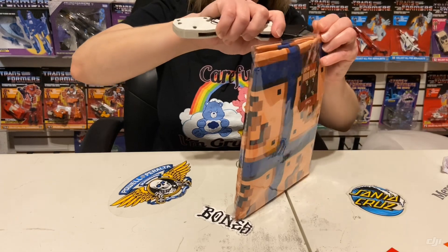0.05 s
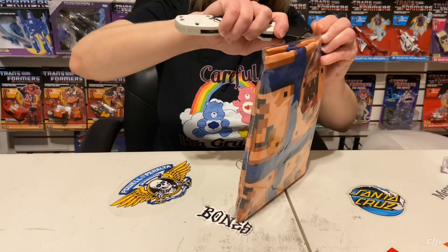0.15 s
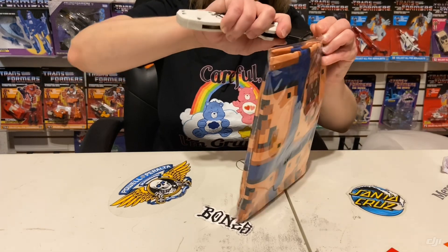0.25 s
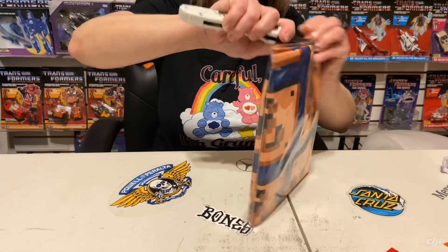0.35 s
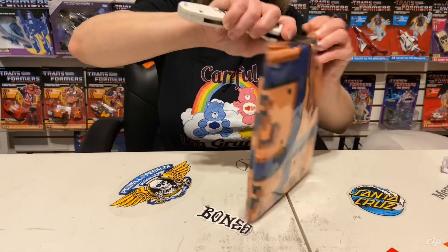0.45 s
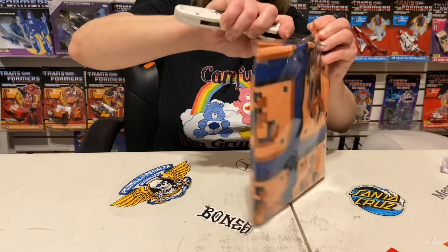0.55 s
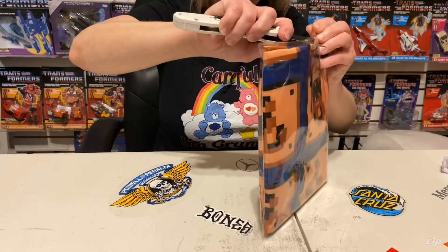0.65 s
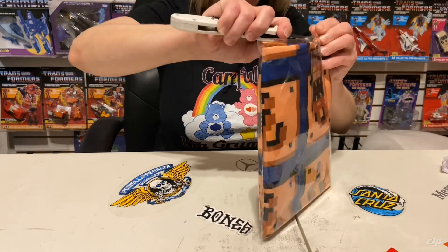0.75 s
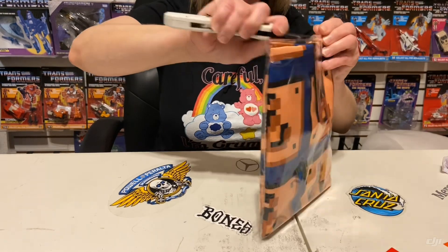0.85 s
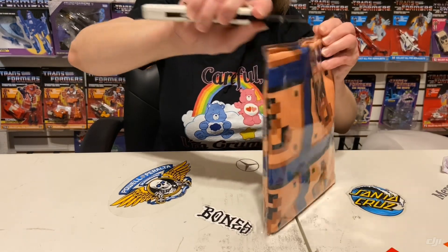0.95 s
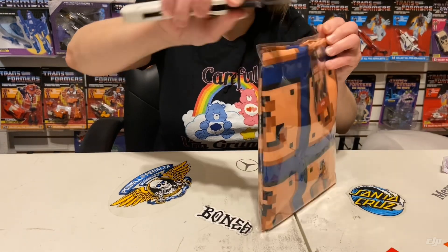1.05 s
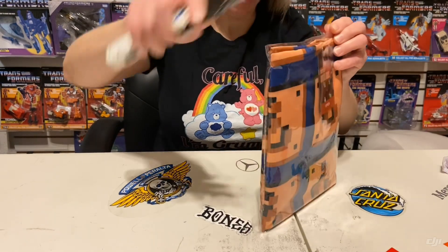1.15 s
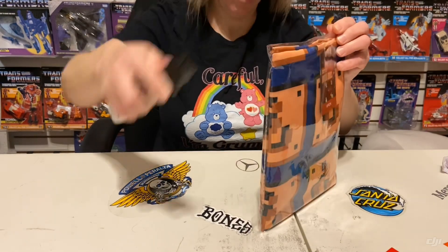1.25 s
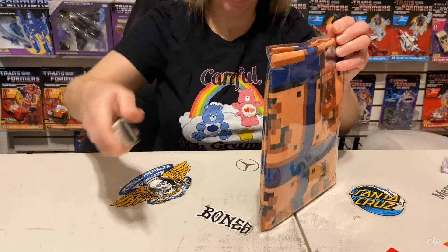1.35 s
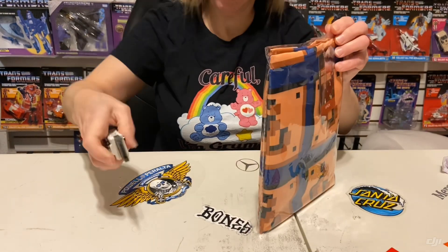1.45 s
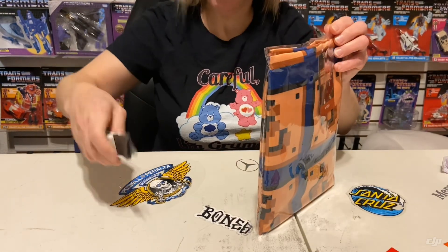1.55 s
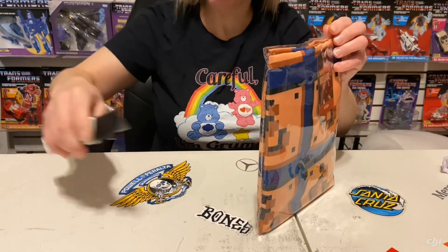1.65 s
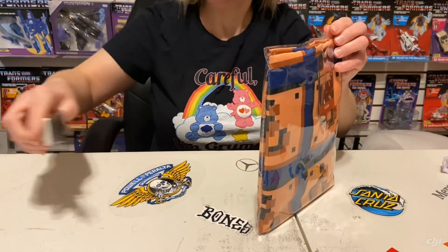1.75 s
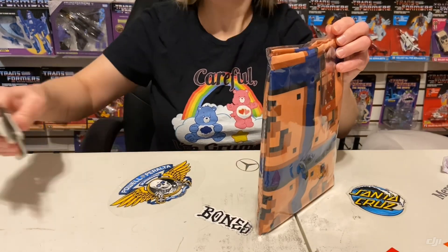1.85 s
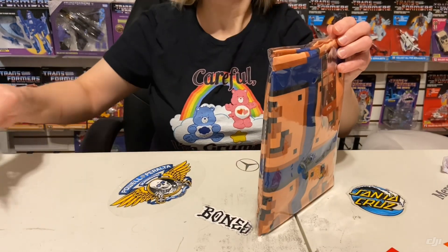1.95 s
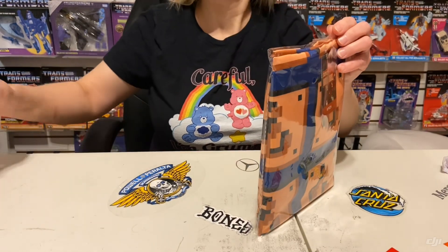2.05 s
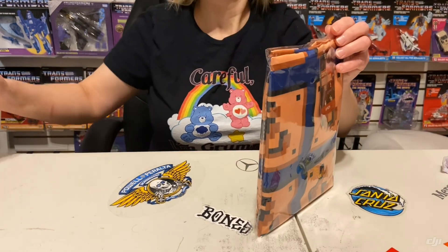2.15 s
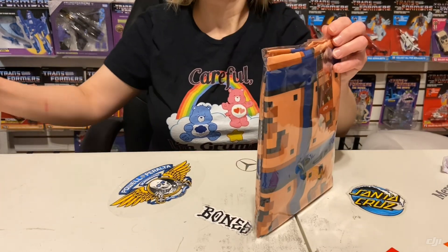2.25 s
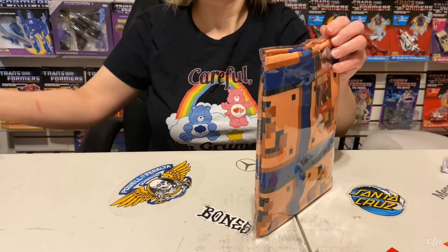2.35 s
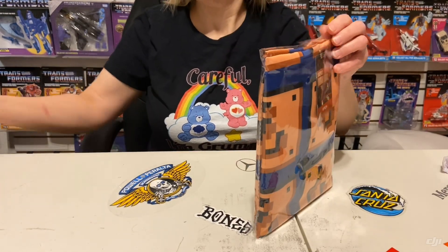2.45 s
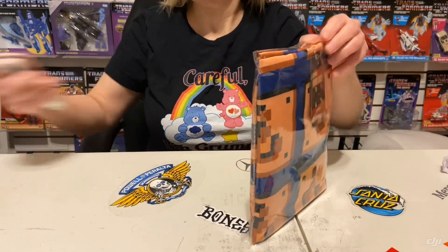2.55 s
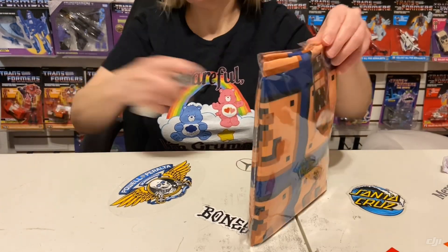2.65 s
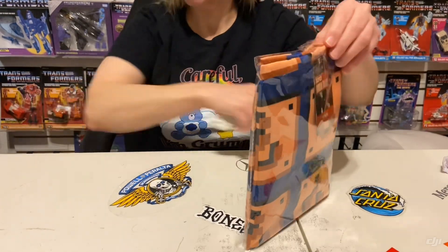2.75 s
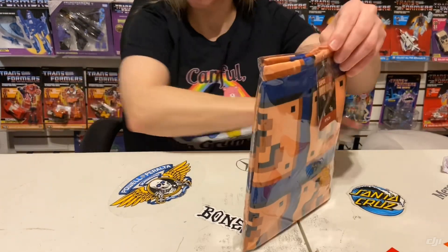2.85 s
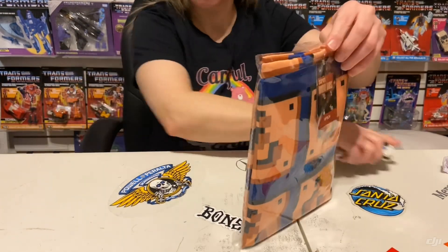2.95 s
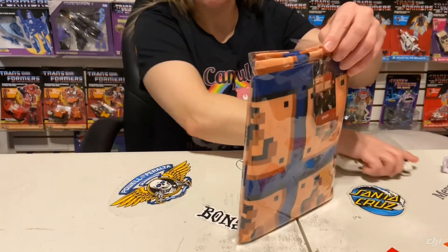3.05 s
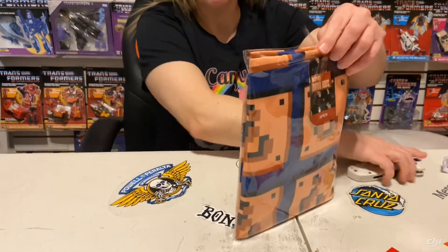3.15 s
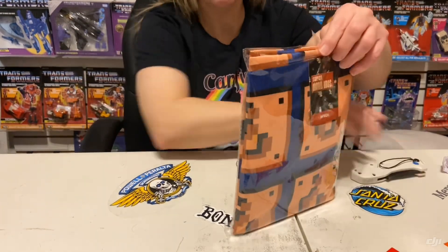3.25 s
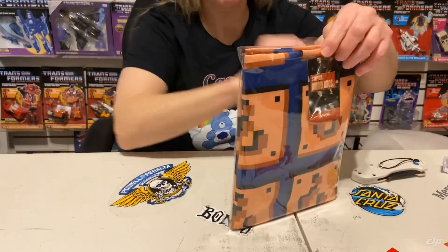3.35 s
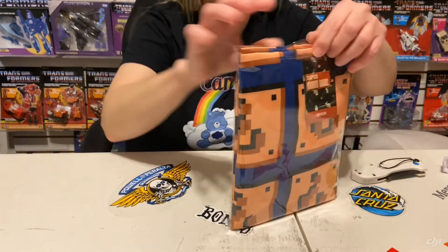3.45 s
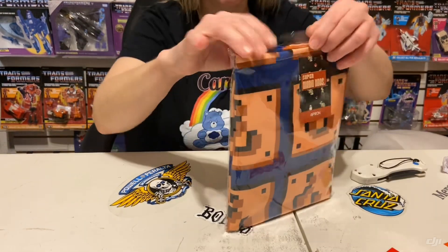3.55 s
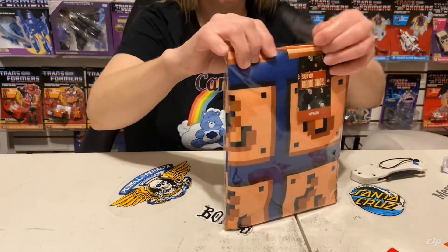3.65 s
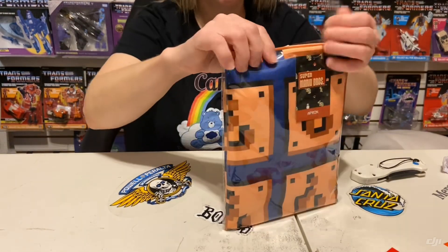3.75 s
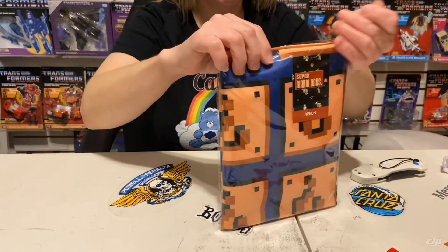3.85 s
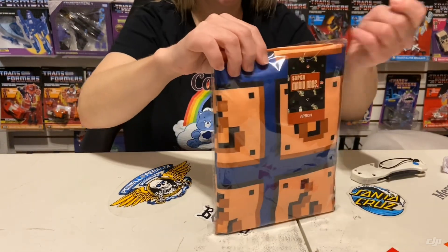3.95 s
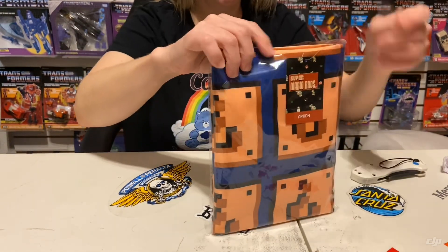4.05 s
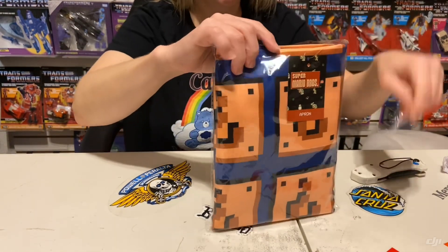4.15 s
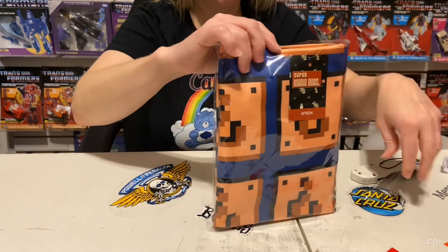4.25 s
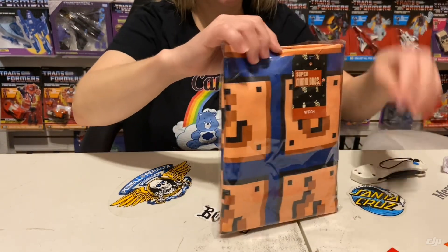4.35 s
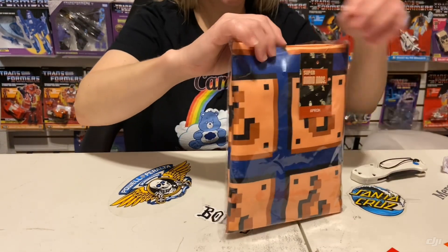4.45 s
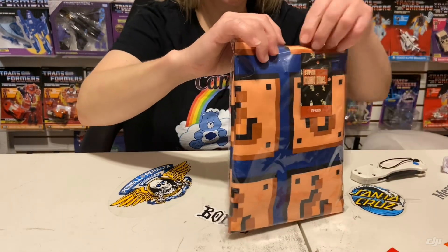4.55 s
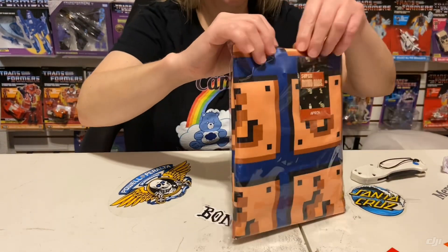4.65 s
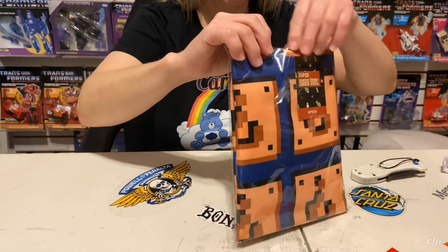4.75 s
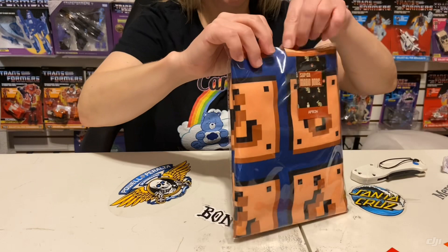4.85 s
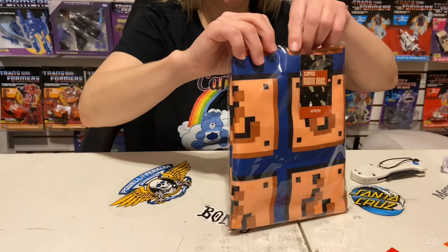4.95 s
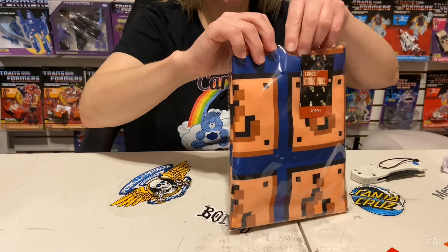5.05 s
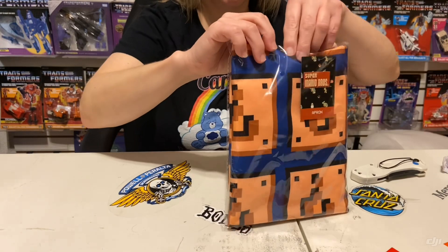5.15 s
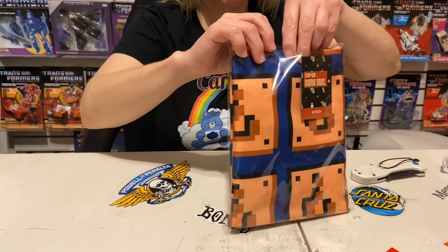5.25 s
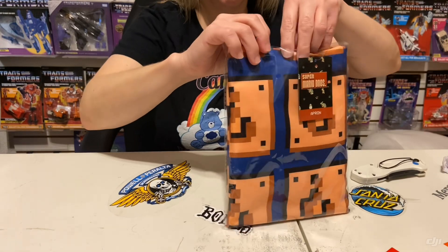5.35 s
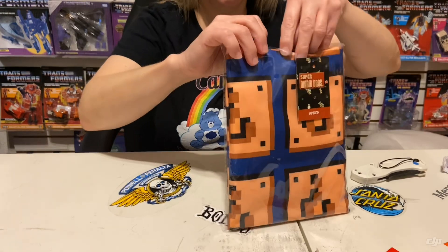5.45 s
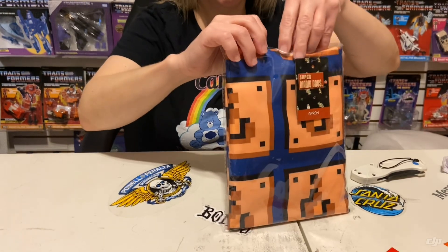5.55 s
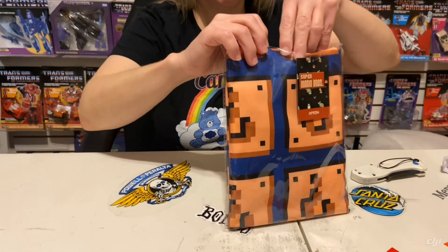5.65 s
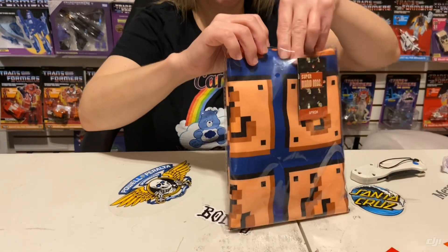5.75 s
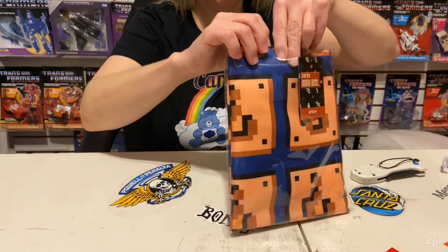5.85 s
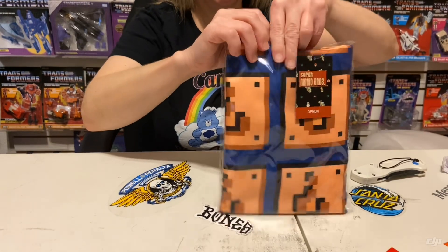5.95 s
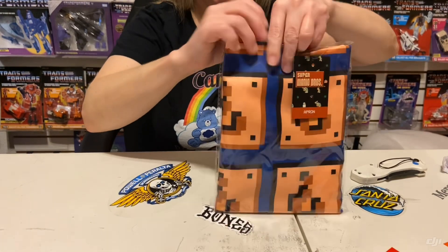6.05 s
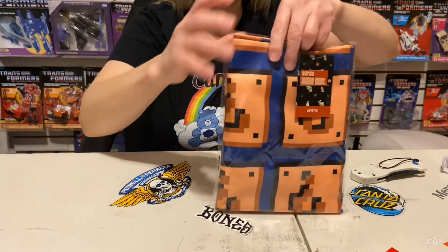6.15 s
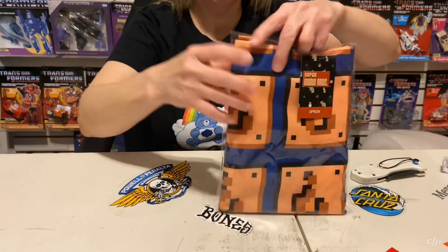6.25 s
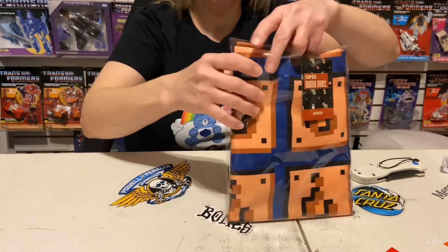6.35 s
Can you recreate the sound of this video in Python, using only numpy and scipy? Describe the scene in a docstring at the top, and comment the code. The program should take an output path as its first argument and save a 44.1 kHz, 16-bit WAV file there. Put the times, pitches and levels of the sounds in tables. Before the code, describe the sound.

Bright bursts of crinkling film come first, thinning out after about a second. A pocketknife closes with a quick gritty scrape and a sharp metallic click, then clacks onto the table top amid renewed crackling. Irregular snaps and rustles continue, with muffled cloth movement and low bumps near the end. Close, dry indoor sound with a short room tail and faint air noise.

```python
"""Close up, film crackles along a blade as a plastic bag holding folded fabric is slit open at a table.
The folding knife scrapes round its pivot, clicks shut and is put down on the table top.
Fingers then pry at the mouth of the bag: creases snap, fabric rubs, and the table is bumped twice.
Film and cloth are swarms of small ringing cracks; knife and table are struck noise and decaying modes.
The room is small and quiet: faint air noise lies under everything, and a diffuse tail follows the sounds."""
import sys
import numpy as np
from scipy import signal
from scipy.fft import rfft, irfft
from scipy.io import wavfile

SR = 44100
rng = np.random.default_rng(int(sys.argv[2]) if len(sys.argv) > 2 else 0)


def waveform_to_disk(signal):
    """Save audio, clipped to [-1, 1], as 16-bit WAV at the path in sys.argv[1]."""
    frames = np.transpose(np.atleast_2d(signal))
    scaled = np.clip(frames, -1, 1) * 32767
    samples = np.round(scaled).astype(np.int16)
    wavfile.write(sys.argv[1], SR, samples)


N = 282240
TIME = np.arange(N) / SR


def from_db(db):
    """Amplitude ratio of a level in dB."""
    return 10 ** (np.asarray(db) / 20)


def unit(x):
    """Scaled to an energy of one."""
    return x / np.sqrt(np.sum(x ** 2) + 1e-20)


def unit_rms(x):
    """A full-length signal scaled to an rms of one."""
    return np.sqrt(N) * unit(x)


def at_hz(points, hz):
    """A curve given at a few frequencies, read between them on a logarithmic frequency axis."""
    points_hz, values = np.array(points).T
    return np.interp(np.log(np.maximum(hz, 1)), np.log(points_hz), values)


def convolve(x, response):
    """The sound x passed through an impulse response, at its own length."""
    return signal.fftconvolve(x, response)[:len(x)]


def response_of(spectrum, size=2048):
    """The causal, most compact (minimum-phase) impulse response that has this spectrum."""
    bins_hz = np.arange(size + 1) * SR / (2 * size)
    cepstrum = irfft(np.log(from_db(at_hz(spectrum, bins_hz))))
    # folding the cepstrum onto positive time puts the energy as early as it can be
    cepstrum[1:size] *= 2
    cepstrum[size + 1:] = 0
    return unit(irfft(np.exp(rfft(cepstrum)))[:size])


def butterworth(x, hz, kind):
    """Second-order Butterworth filter."""
    return signal.sosfilt(signal.butter(2, hz, kind, fs=SR, output="sos"), x)


def resonate(x, hz, width):
    """One resonance, with its pitch and bandwidth in Hz."""
    r = np.exp(-np.pi * width / SR)
    zeros = np.array([1, 0, -1]) * (1 - r * r) / 2
    poles = [1, -2 * r * np.cos(2 * np.pi * hz / SR), r * r]
    return signal.lfilter(zeros, poles, x)


def fade(t60, size):
    """Exponential decay by 60 dB in t60 seconds."""
    return np.exp(-np.log(1000) * TIME[:size] / t60)


def burst(t60, size=2048, rise_s=0.00066):
    """Many close modes struck at once: noise that swells in an instant and dies away."""
    swell = 1 - np.exp(-TIME[:size] / rise_s)
    noise = rng.choice([-1, 1], size) * rng.uniform(0.64, 1, size)
    return unit(noise * swell * fade(t60, size))


def add(out, s, sound):
    """Mixes a sound into out, starting at s seconds."""
    at = max(round(s * SR), 0)
    out[at:at + len(sound)] += sound[:N - at]


def drift(rate):
    """Slow chance: a random wander through `rate` new values a second, with a spread of one."""
    knots = rng.standard_normal(2000)
    # straight lines between the knots shrink the spread; the root restores it
    return np.interp(TIME * rate, np.arange(len(knots)), knots) * np.sqrt(3 / 2)


def strokes(rows, attack_s, release_db_per_s):
    """Gain of overlapping movements (start, hold, dB): each sets in, is held, then dies away."""
    power = np.full(N, 1e-14)
    for start, hold, db in rows:
        age = TIME[:N - max(round(start * SR), 0)]
        release_db = release_db_per_s * np.maximum(age - hold, 0)
        gain = np.minimum(age / attack_s, 1) * from_db(db - release_db)
        add(power, start, gain ** 2)
    return np.sqrt(power)


def grains(per_s, spread_db):
    """Clicks at random moments, with sizes spread by chance; rms 1."""
    sizes = from_db(spread_db * np.minimum(rng.exponential(1, N), 3.2)) * rng.choice([-1, 1], N)
    return unit_rms(sizes * (rng.random(N) < per_s / SR))


def swarm(per_s, spread_db, low_hz, high_hz, colour, focus, count=12):
    """Dense small cracks; each fold rings at its pitch in short spells, so the colour shifts; rms 1."""
    clicks, dealt, cracks = grains(per_s, spread_db), rng.integers(0, count, N), 0
    for k, hz in enumerate(np.geomspace(low_hz, high_hz, count)):
        spells = from_db(4.0 * drift(30))
        fold = convolve(clicks * (dealt == k), burst(0.0064))
        ring = unit(spells * resonate(fold, hz, .35 * hz)) * np.sqrt(hz / high_hz)
        cracks = cracks + unit(fold) + focus * ring
    return unit_rms(convolve(cracks, response_of(colour)))


# Spectrum of the quiet room's air. Each row: frequency in Hz, relative level in dB.
AIR_COLOUR = [(30, -10.5), (86, 3.5), (280, -8.5), (1230, -18.5), (3900, -22.5), (12000, -34)]


def room_air(level_db=-72):
    """Steady noise, shaped like the air of the quiet room."""
    return from_db(level_db) * convolve(rng.standard_normal(N), response_of(AIR_COLOUR))


# Pushes of the blade, then of the fingers, on the film. Each row: start in seconds, time held in
# seconds, drive of the tight creases in dB, drive of the slack folds relative to them in dB.
FILM_PUSHES = [(0.078, 0.034, -47.5, -5.5), (0.222, .08, -54, -4.5), (0.303, 0.085, -48.5, -4),
               (0.364, 0.062, -35.5, -7), (0.503, .03, -44.5, -1), (0.652, 0.025, -48, -3),
               (0.814, .015, -44.5, -3.5), (0.881, 0.067, -39, -4), (1.222, 0.028, -61, -2.5),
               (1.4, .1, -69.5, -4), (2.509, 0.18, -53, -2.5), (2.658, 0.021, -50.5, -18),
               (2.836, 0.021, -50.5, -2), (3.028, .32, -55.5, -2.5), (3.44, 0.22, -49, -5),
               (3.61, 0.21, -42.5, -7.5), (3.665, 0.023, -47, 5), (3.926, 0.031, -53, -2),
               (4.302, 0.0091, -48, -15), (4.581, 0.051, -44.5, -8), (4.81, 0.11, -57.5, -3),
               (5.03, .18, -57.5, -1.5), (5.245, .035, -54, -6), (5.4, 0.087, -55.5, 3),
               (5.68, .08, -55.5, 2.5), (5.765, 0.024, -46, -3), (5.935, 0.11, -45.5, -5),
               (6.103, 0.01, -42, -7), (6.23, .17, -48.5, -2.5)]
# When the bag is gripped. Each row: start in seconds, time held in seconds.
BAG_GRIPS = [(0, 0.012), (.2, 0.9), (2.444, 3.2)]
ATTACK_S, RELAX_DB_PER_S = 0.0068, 149   # a push takes hold quickly, and the film relaxes evenly after it
GRIP_DB, GRIP_SLACK_DB = -59.5, -2.5   # drive of a bag just being held; its slack folds relative to that


def film_motion():
    """How strongly the tight creases and the slack folds are worked, by the pushes and by the grip."""
    moves = list(FILM_PUSHES) + [(start, hold, GRIP_DB, GRIP_SLACK_DB) for start, hold in BAG_GRIPS]
    tight_rows = [(start, hold, db) for start, hold, db, _ in moves]
    slack_rows = [(start, hold, db + slack_db) for start, hold, db, slack_db in moves]
    tight = strokes(tight_rows, ATTACK_S, RELAX_DB_PER_S)
    slack = strokes(slack_rows, ATTACK_S, RELAX_DB_PER_S)
    return tight, slack


# Spectrum of the tightly creased film. Each row: frequency in Hz, relative level in dB.
TIGHT_COLOUR = [(300, -28), (1500, -13.5), (3000, -0.5), (5200, 0.5), (10000, -1.5), (12000, -7)]
# Spectrum of the film's slack folds. Each row: frequency in Hz, relative level in dB.
SLACK_COLOUR = [(60, 1.5), (200, -12), (550, -3.5), (1000, -7), (1900, -2.5), (5000, -9.5), (12000, -38)]


def crinkle(tight, slack, tight_db=-1.5, slack_db=1.0, slide_db=-6.5):
    """Sliding film rustles evenly; the harder it is worked, the denser and more uneven the creases."""
    work = np.sqrt(tight / tight.max())
    creases = swarm(per_s=2500 + 800 * work, spread_db=6.0 + 3.5 * work,
                    low_hz=2830, high_hz=11700, colour=TIGHT_COLOUR, focus=1.3)
    folds = swarm(per_s=1600, spread_db=3.0 + 1.9 * work,
                  low_hz=283, high_hz=3160, colour=SLACK_COLOUR, focus=1.2)
    slide = from_db(slide_db) * convolve(rng.standard_normal(N), response_of(TIGHT_COLOUR))
    return tight * (from_db(tight_db) * creases + slide) + from_db(slack_db) * slack * folds


def crease(hz, t60=0.013, ring_db=-7.5, width_share=0.12, echo_s=0.0022, echo=0.14):
    """One buckle: a crack that rings a few cycles at its own pitch, then comes again off the table top."""
    crack = burst(t60)
    # the ring takes a set share of the energy, however low the crease is pitched
    crack = from_db(ring_db) * unit(resonate(crack, hz, width_share * hz)) + crack
    age = TIME[:len(crack)]
    return unit(crack + echo * np.interp(age - echo_s, age, crack, left=0))


# Spectrum of a snapping crease. Each row: frequency in Hz, relative level in dB.
CREASE_COLOUR = [(200, -10), (700, -13.5), (1500, 0.5), (3000, 0), (5200, -1), (7500, 0), (10000, 0.5),
                 (12000, -4.5)]


def small_snaps(tight, pitch_hz=5400, over_db=24.5, spread_db=5, follows=.8, count=150):
    """Lesser creases flip at odd moments; they grow more slowly than the rustle and stand out in lulls."""
    out, film = np.zeros(N), response_of(CREASE_COLOUR)
    # they follow a share of the rustle's swing, and fade out where the film is worked less than by the grip
    followed = tight.max() * (tight / tight.max()) ** follows
    strength = followed * np.minimum(tight / from_db(GRIP_DB), 1)
    for k, (late, size, octaves) in enumerate(rng.uniform([0, -1, -1], 1, (count, 3))):
        at = int((k + late) * N / count)
        crack = unit(convolve(crease(pitch_hz * 2 ** octaves, t60=.006), film))
        add(out, at / SR, strength[at] * from_db(over_db + spread_db * size) * crack)
    return out


# Shifting of the fabric in the bag. Each row: start in seconds, time held in seconds, drive in dB.
FABRIC_SHIFTS = [(4.775, 0.22, -56.5), (5.02, 0.14, -57), (5.24, 0.047, -51), (5.56, 0.16, -47.5)]
# Spectrum of the dull cloth. Each row: frequency in Hz, relative level in dB.
CLOTH_COLOUR = [(60, -5.5), (170, -2.5), (350, -5.5), (700, -6), (1500, -16.5), (6000, -60)]


def fabric(slack, follows_db=-11.5):
    """Folded cloth slips against the film in dull strokes, and stirs a little with every push."""
    slip = strokes(FABRIC_SHIFTS, ATTACK_S, RELAX_DB_PER_S) + from_db(follows_db) * slack
    return slip * swarm(per_s=1200, spread_db=5.5, low_hz=111.0, high_hz=597, colour=CLOTH_COLOUR, focus=0.73)


# Weight put on the table. Each row: start in seconds, time held in seconds, drive in dB.
TABLE_LOADS = [(.93, 0.17, -63), (2.57, .3, -68.5), (3.195, 0.13, -43.5), (4.95, 0.65, -61),
               (5.475, .3, -34.5)]


def rocking(slack, hz=58, width=22, attack_s=0.007, dies_db_per_s=130, follows_db=-28.5):
    """The table rocks on its legs at one low resonance when leaned on or knocked, or stirred by a push."""
    sway = resonate(resonate(rng.standard_normal(N), hz, width), hz, 2 * width)
    load = strokes(TABLE_LOADS, attack_s, dies_db_per_s) + from_db(follows_db) * slack
    return load * unit_rms(sway)


# Large creases buckling. Each row: start in seconds, relative level in dB, pitch of the crease in Hz,
# relative level of the flap of the panel around it in dB.
LARGE_SNAPS = [(0.078, -25, 8100, -28), (0.0955, -18, 3280, -23), (0.2228, -30.5, 1460, -12.5),
               (0.3036, -23.5, 6250, -33), (0.3323, -23, 3080, -23), (0.3668, -22, 1700, -11.5),
               (0.3805, -13.5, 5200, -18.5), (0.5055, -19.5, 3940, -33), (0.6588, -27.5, 4800, -22),
               (0.819, -24, 6100, -21), (0.8885, -19, 2880, -25), (0.9518, -18.5, 5150, -16),
               (1.154, -41.5, 3420, -27), (1.1785, -38, 1810, -17.5), (1.225, -36.5, 3130, -26),
               (1.589, -51.5, 1910, -11.5), (2.4453, -32.5, 4630, -29), (2.5136, -27, 4560, -26.5),
               (2.6015, -25.5, 2320, -19.5), (2.8461, -26, 5400, -17), (2.9369, -32, 4090, -15),
               (3.0309, -25, 5620, -43), (3.2997, -27.5, 8100, -8), (3.4759, -23.5, 1900, -24.5),
               (3.5192, -25, 6540, -26), (3.5464, -17, 5520, -38), (3.616, -18.5, 8800, -42),
               (3.7023, -14.5, 2920, -31), (3.7542, -20, 3000, -29), (3.9271, -22, 1330, -17.5),
               (3.9824, -23.5, 3050, -19.5), (4.222, -25, 5200, -29), (4.3161, -19, 5100, -34),
               (4.3638, -33, 9800, -20.5), (4.3809, -32, 4140, -27), (4.5217, -26, 5280, -46),
               (4.5816, -22.5, 1730, -26.5), (4.6901, -30.5, 1540, -34), (4.796, -29, 5670, -26),
               (4.8359, -28.5, 7900, -30), (4.855, -26.5, 6600, -34), (4.9275, -28.5, 4870, -20),
               (5.0083, -31, 7930, -21), (5.2638, -19, 5360, -27), (5.9064, -27.5, 7800, -25),
               (6.02, -23, 3120, -31), (6.2014, -27, 5900, -25), (6.2392, -18.5, 8900, -22),
               (6.3013, -21, 10100, -28), (6.3352, -19.5, 3070, -29)]
# Spectrum of a flapping panel of film. Each row: frequency in Hz, relative level in dB.
FLAP_COLOUR = [(80, -8), (300, -12), (580, 0.5), (950, -11), (1500, -34), (3000, -16), (12000, -44)]


def snaps(crack_db=12.0, panel_db=25.0, panel_t60=0.11, neighbour_db=-19.5,
          before_s=0.00052, after_s=0.0086, count=3):
    """Large creases flip one at a time, along with a few neighbours, and shake the film around them."""
    out, film, panel = np.zeros(N), response_of(CREASE_COLOUR), response_of(FLAP_COLOUR)
    for s, db, hz, flap_db in LARGE_SNAPS:
        crack = unit(convolve(crease(hz), film))
        add(out, s, from_db(db + crack_db) * crack)
        flap = unit(convolve(burst(panel_t60), panel))
        add(out, s, from_db(db + flap_db + panel_db) * flap)
        for wait, octaves in rng.uniform([-before_s, -.5], [after_s, .5], (count, 2)):
            neighbour = unit(convolve(crease(hz * 2 ** octaves), film))
            add(out, s + wait, from_db(db + crack_db + neighbour_db) * neighbour)
    return out


# Catches of the knife's pivot. Each row: start in seconds, relative level in dB.
PIVOT_CATCHES = [(2.003, -55.5), (2.051, -54.5), (2.093, -44), (2.104, -46), (2.134, -43.5), (2.153, -33.5)]
# Spectrum of the scraping pivot. Each row: frequency in Hz, relative level in dB.
SCRAPE_COLOUR = [(300, -18.5), (1900, -17.5), (2400, -1.5), (3700, 0), (4900, -11.5), (6300, 0.5),
                 (8200, -20.5), (12000, -24.5)]
# Blows that ring the knife, as it latches shut and as it is laid down.
# Each row: start in seconds, relative level in dB.
KNIFE_BLOWS = [(2.1566, -20.5), (2.162, -30.5), (2.17, -28.5), (2.222, -44.5), (3.123, -35), (3.201, -30),
               (3.224, -41)]
# Spectrum of the struck knife. Each row: frequency in Hz, relative level in dB.
KNIFE_COLOUR = [(150, -28.5), (550, -12.5), (1200, -17), (1950, -15.5), (2280, -4.5), (2850, -2),
                (3300, -2), (3750, -7), (4800, -8), (6100, -4.5), (8500, -11), (10000, -11.5), (12000, -18)]


def knife(pivot_db=-46.5, swell_db_per_s=199, click_db=22.0, click_t60=0.014, ring_db=-7.5, ring_t60=0.21):
    """The blade scrapes and catches round its pivot, harder and harder until it latches; the handle rings."""
    to_go = KNIFE_BLOWS[0][0] - TIME
    swing = from_db(pivot_db - swell_db_per_s * np.abs(to_go)) * (to_go > 0)
    scrape, struck = swing * grains(per_s=340, spread_db=-0.5), np.zeros(N)
    for s, db in PIVOT_CATCHES:
        add(scrape, s, from_db(db + click_db) * burst(0.033))
    for s, db in KNIFE_BLOWS:
        blow = burst(click_t60, size=8192) + from_db(ring_db) * burst(ring_t60, size=8192)
        add(struck, s, from_db(db + click_db) * blow)
    return convolve(scrape, response_of(SCRAPE_COLOUR)) + convolve(struck, response_of(KNIFE_COLOUR))


# Blows on the table. Each row: start in seconds, relative level in dB, hardness of the contact in Hz,
# relative level of the deep flexing of the top in dB, change at each rebound in dB.
TABLE_BLOWS = [(3.122, -26.5, 990, -8, -7.5), (3.181, -26.5, 335, -22, -21), (3.2, -16, 2120, -13, -3.5),
               (5.4669, -27.5, 460, 9, -5), (5.635, -27.5, 417, -35, -15.5), (5.647, -39.5, 250, 7.5, -3.5),
               (5.734, -38, 250, -9, -5)]
# Modes of the table top. Each row: frequency in Hz, relative level in dB, decay time t60 in seconds.
TABLE_MODES = [(124, -12, .22), (166, -9, .2), (253, -6, .17), (328, -7, .15), (358, -2, .15),
               (395, -1, .15), (482, -5, .16), (598, -9, .18), (700, -9, .18), (770, -8, .18),
               (861, -9, .15), (1180, -15, .14), (1330, -9, .15), (1470, -11, .14)]
# Spectrum of the thud of the board. Each row: frequency in Hz, relative level in dB.
BOARD_COLOUR = [(50, -8.5), (150, 3), (400, 2.5), (800, 1), (1400, -2), (2800, -3), (4500, -1),
                (12000, -6.5)]
TABLE_LOWEST_HZ = 124   # below its lowest mode the top gives out little sound
REBOUND_S, REBOUND_HZ = 0.021, 587   # spacing of the rebounds, and the hardness of their contact


def table(knock_db=30.5, thud_db=12.0, thud_t60=0.045, flex_hz=160, flex_t60=0.14,
          stiffening=0.34, settle_s=0.0087, size=22050, count=3):
    """Blows and rebounds thud and ring the top's modes; soft contacts lose treble, heavy ones flex the board."""
    out, board, age = np.zeros(N), response_of(BOARD_COLOUR), TIME[:size]
    modes = np.zeros(size)
    for k, (hz, level, t60) in enumerate(TABLE_MODES):
        # neighbouring modes start in opposite directions
        modes += (-1) ** k * from_db(level) * np.sin(2 * np.pi * hz * age) * fade(t60, size)
    modes = unit(modes)
    # the board takes a moment to bend, and is stiffer while it is bent far
    pitch = flex_hz * (1 + stiffening * np.exp(-age / settle_s))
    bend = np.minimum(age / 0.003, 1)
    flex = unit(np.sin(2 * np.pi * np.cumsum(pitch) / SR) * fade(flex_t60, size) * bend)
    for s, db, hardness_hz, flex_db, rebound_db in TABLE_BLOWS:
        add(out, s, from_db(db + knock_db + flex_db) * flex)
        for k in range(count):
            blow = modes + from_db(thud_db) * unit(convolve(burst(thud_t60, size), board))
            blow = butterworth(blow, REBOUND_HZ if k else hardness_hz, "low")
            blow = butterworth(blow, TABLE_LOWEST_HZ, "high")
            add(out, s + k * REBOUND_S, from_db(db + knock_db + k * rebound_db) * unit(blow))
    return out


# Decay of the small room. Each row: frequency in Hz, decay time t60 in seconds.
ROOM_T60 = [(80, 0.49), (300, 0.19), (1000, 0.26), (3000, 0.27), (7000, 0.29), (12000, 0.2)]


def room(x, gap_s=0.0016, build_s=0.0033, size=22050):
    """A diffuse tail of noise bands that builds up after the direct sound, each with its own decay."""
    edges, tail = np.geomspace(40, 16000, 10), 0
    for low, high in zip(edges, edges[1:]):
        band = butterworth(rng.standard_normal(size), [low, high], "band")
        tail = tail + band * fade(at_hz(ROOM_T60, np.sqrt(low * high)), size)
    build_up = np.clip((TIME[:size] - gap_s) / build_s, 0, 1)
    return convolve(x, unit(tail * build_up))


def scene():
    """Bag and knife are both close to the microphone, with nearly the same share of room sound."""
    air = room_air()
    tight, slack = film_motion()
    bag = crinkle(tight, slack) + small_snaps(tight) + fabric(slack) + snaps()
    sway, blade, top = rocking(slack), knife(), table()
    reverberation = room(from_db(-14.0) * bag + from_db(-13.5) * blade + from_db(-9.0) * top)
    return (bag + blade + top + sway + reverberation + air)[None]


def record(dry, bass_hz=35, cutoff_hz=12000):
    """At the microphone the deepest bass is rolled off and the top is cut steeply."""
    thinned = butterworth(dry, bass_hz, "high")
    return signal.sosfilt(signal.ellip(10, .5, 70, cutoff_hz, fs=SR, output="sos"), thinned)


dry = scene()
out = record(dry)
waveform_to_disk(out)
```